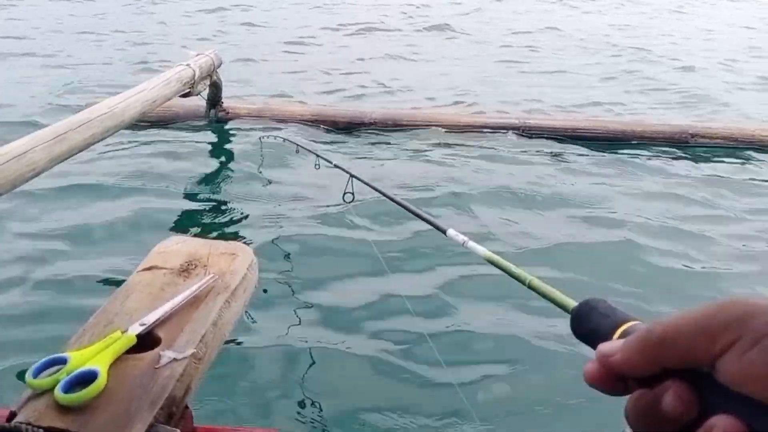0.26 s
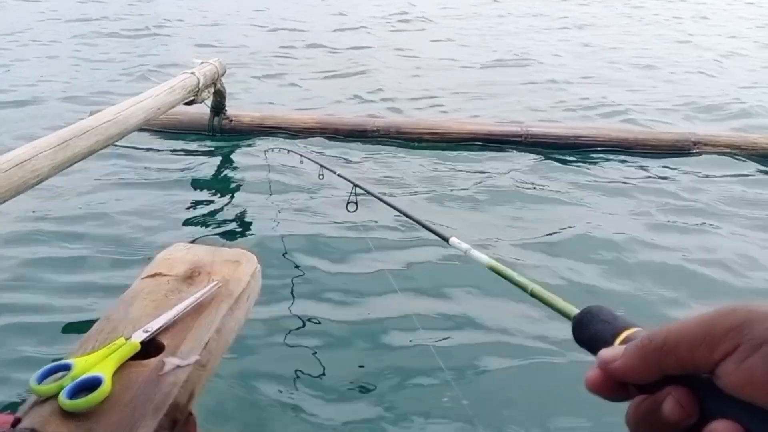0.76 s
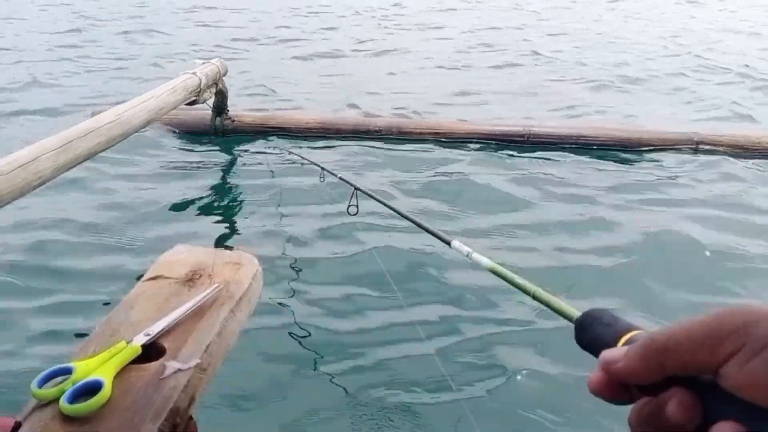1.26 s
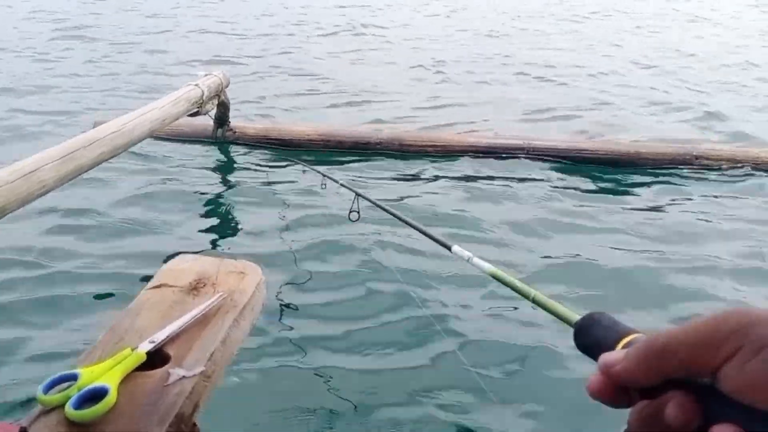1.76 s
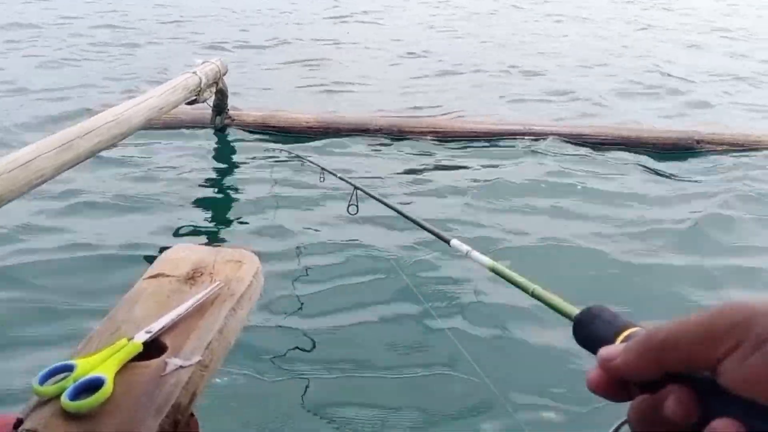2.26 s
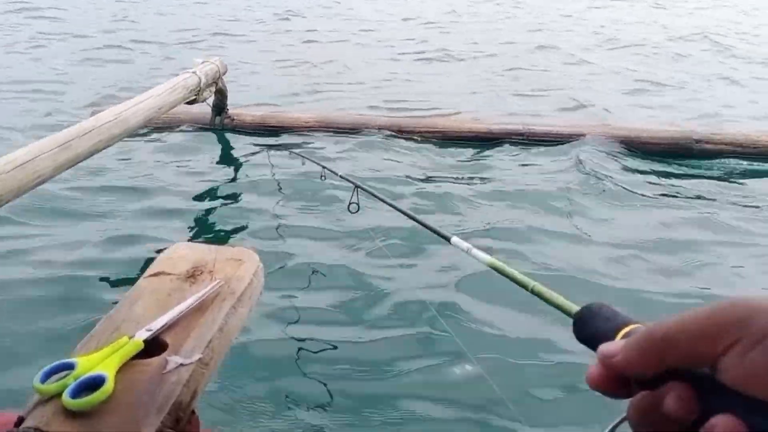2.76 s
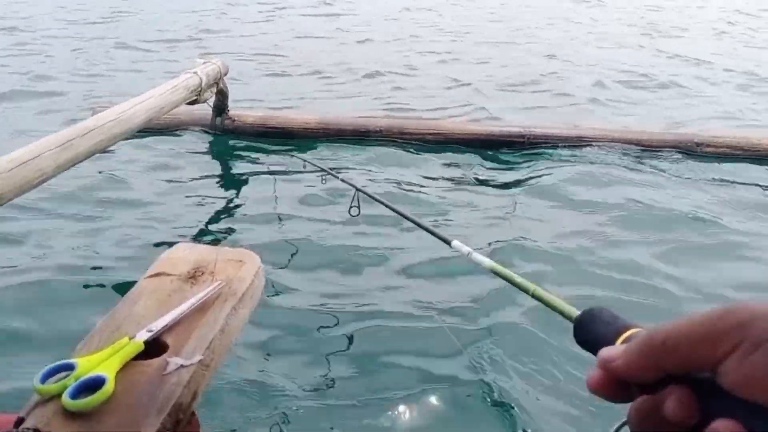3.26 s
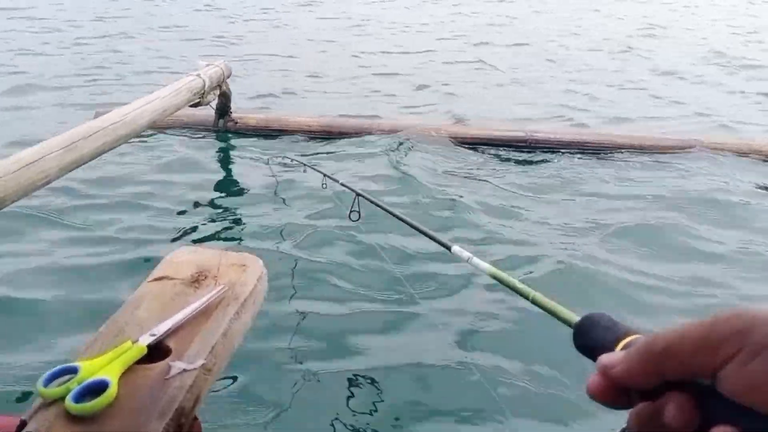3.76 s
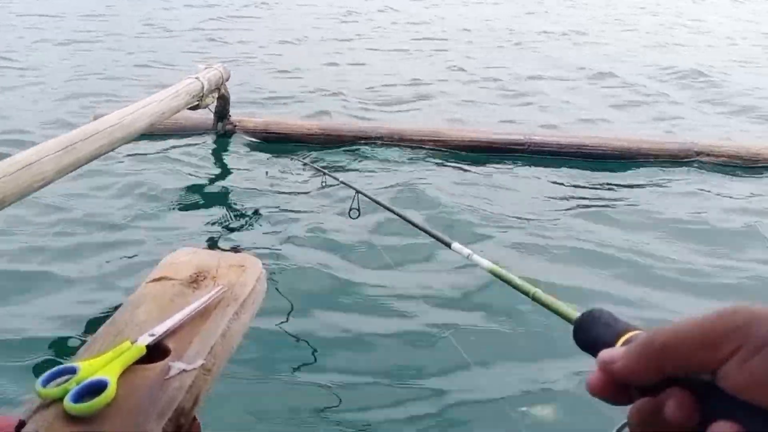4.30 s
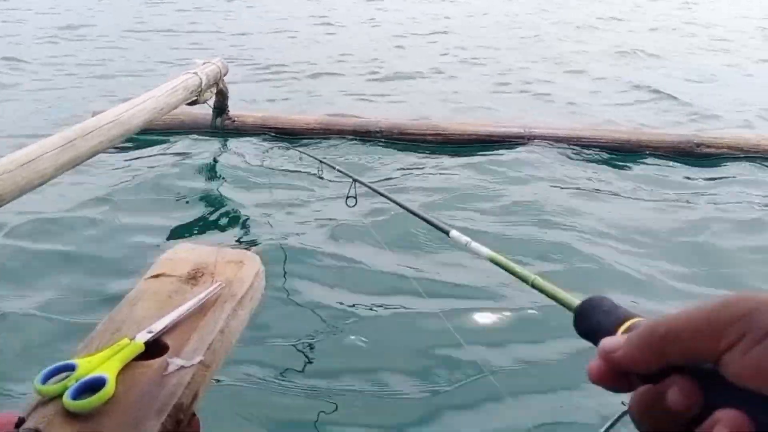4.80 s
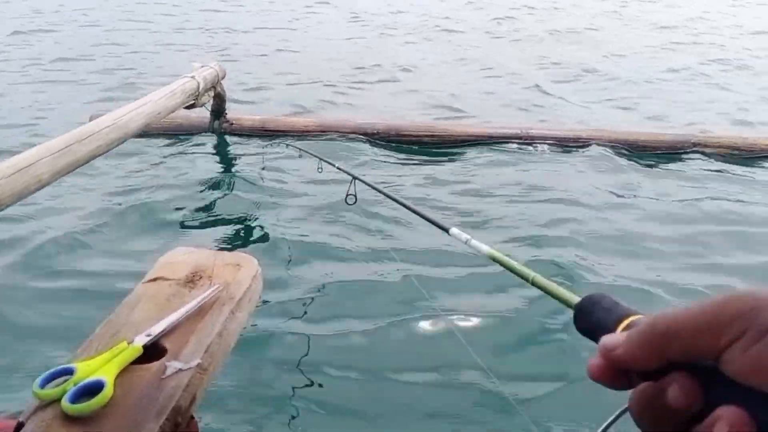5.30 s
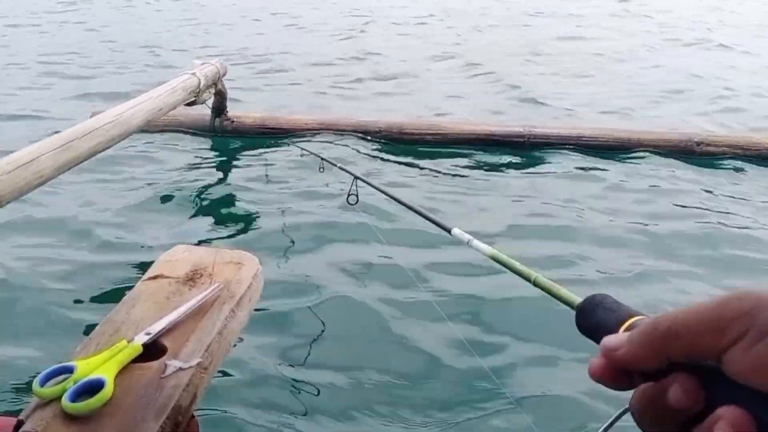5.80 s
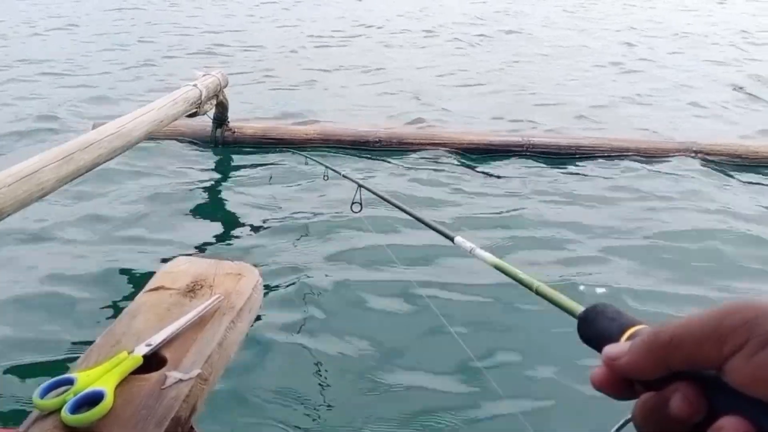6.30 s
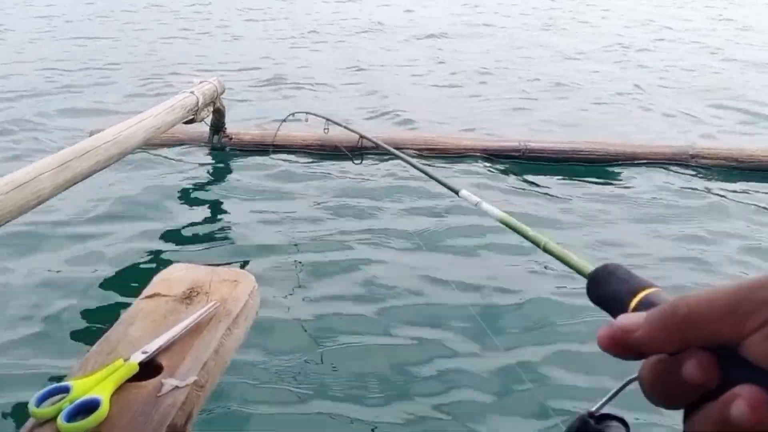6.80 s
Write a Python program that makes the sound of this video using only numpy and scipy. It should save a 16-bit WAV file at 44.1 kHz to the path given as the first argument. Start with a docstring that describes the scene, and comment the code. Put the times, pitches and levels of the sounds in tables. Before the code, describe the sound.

Wind buffets the microphone in low bursts as water laps and splashes close against a wooden boat, with faint insects far away.

```python
"""On a calm sea, a small microphone close to a wooden outrigger canoe. Wind buffets it at the start, as
small waves begin to slap the wood; each slap traps air that rings as a cluster of bubbles, and fine spray
flies. From about 2 s insects swell on the far shore, one thin singer among them. Near 5 s the gusts and
puffs come back hard, and the heaviest slap lands just before the end."""
import sys
import numpy as np
from scipy import signal
from scipy.fft import rfft, irfft, next_fast_len
from scipy.io import wavfile
from scipy.ndimage import uniform_filter1d

SR = 44100
rng = np.random.default_rng(int(sys.argv[2]) if len(sys.argv) > 2 else 0)


def dump(signal):
    """Clip the signal to [-1, 1] and save it as 16-bit WAV at the path in sys.argv[1]."""
    limited = np.clip(np.atleast_2d(signal).T, -1, 1)
    pcm = np.round(limited * 32767).astype(np.int16)
    wavfile.write(sys.argv[1], SR, pcm)


N = 310905

# close slaps on hull and float: start_s, level_db, pitch_hz (trapped air), froth_db (relative to level)
SLAPS = [(0.029, -41.5, 1178, -38), (0.371, -40, 1445, -38), (0.417, -33.5, 990, -31),
         (0.499, -28.5, 1216, -15), (0.58, -45, 1210, -18), (0.605, -41.5, 2200, -13),
         (0.635, -40, 912, -27), (0.715, -45.5, 1098, 0), (0.982, -38.5, 2230, -2), (0.999, -39, 530, -19),
         (1.013, -29.5, 2350, -17.5), (1.062, -37, 1450, -23.5), (1.082, -41, 614, -9),
         (1.131, -46.5, 2530, -20.5), (1.221, -37.5, 3265, -28), (1.248, -41, 1600, -25.5),
         (1.41, -33, 1273, -31), (1.554, -32.5, 1216, -3.5), (2.077, -26, 827, -14), (2.123, -39, 674, 3.5),
         (2.327, -30, 2320, -5.5), (2.513, -35, 757, -22.5), (2.549, -40.5, 4200, -26),
         (2.668, -28, 1273, -13.5), (2.725, -33, 1155, -20.5), (2.761, -32.5, 2060, -2),
         (2.874, -30, 1356, -21), (2.941, -27.5, 673, -13), (3.088, -27.5, 454, -7.5),
         (3.147, -35, 318, -21), (3.276, -43, 730, -18), (3.431, -45, 1750, -27), (3.477, -46, 2200, -31),
         (3.59, -34, 2865, -21.5), (3.749, -36, 833, -27), (3.898, -32, 1180, -21), (4.045, -35, 736, -15),
         (4.178, -42, 1440, -41), (4.297, -30, 1562, -6), (4.422, -40, 368, -17.5), (4.714, -42, 1344, -38),
         (4.787, -45.5, 1240, -24), (4.977, -28, 479, -15), (5.037, -32, 492, -18),
         (5.088, -56.5, 1310, -5.5), (5.149, -35, 990, -28), (5.148, -36.5, 2310, -16),
         (5.35, -42, 920, -31), (5.378, -25, 704, -13), (5.591, -47.5, 880, -32), (5.598, -37.5, 2860, 2.5),
         (5.643, -22.5, 731, -10), (5.676, -33.5, 3240, -5), (5.704, -38, 1640, -22),
         (5.775, -44.5, 3170, -18.5), (5.837, -33.5, 762, -16.5), (5.859, -35, 2510, -2),
         (6.108, -27, 635, -11.5), (6.338, -43, 2300, -4.5), (6.391, -31, 3930, -21),
         (6.492, -39.5, 1310, -33), (6.743, -25.5, 747, -5), (6.773, -31.5, 298, -5),
         (6.841, -18.5, 318, -9.5), (6.938, -32, 610, -5.5), (6.982, -38, 1150, -23.5)]
# sheets of water sliding off the wood: start_s, length_s, level_db, pitch_hz
SHEETS = [(1.027, 0.093, -43.5, 2540), (3.97, 0.13, -49, 6490), (4.025, 0.07, -39, 2190),
          (5.588, 0.086, -44, 2480), (6.824, 0.08, -29, 2227)]
# spray thrown by the waves: start_s, level_db, pitch_hz, fizz_db (relative to level)
SPRAY = [(0.608, -39.5, 5660, 0), (0.714, -46, 6380, -8), (0.988, -45.5, 7200, 6.5),
         (1.012, -37.5, 5870, 17.5), (1.067, -35.5, 7840, 2), (1.372, -47, 7430, 6),
         (1.699, -47.5, 4850, 3.5), (2.059, -37.5, 6280, 7.5), (2.1317, -38, 4510, -1),
         (2.211, -49, 6130, 5), (2.2827, -58.5, 5980, 19.5), (2.386, -51, 6000, 1),
         (2.459, -58, 7150, 25.5), (2.763, -40.5, 6700, -5.5), (3.076, -40, 6170, -47),
         (3.138, -55, 7470, 17.5), (3.277, -48.5, 5830, -17), (3.586, -45.5, 7480, 15),
         (3.682, -48.5, 6970, 4), (3.832, -32.5, 7070, 14), (4.033, -44, 6780, 3.5),
         (4.298, -34, 6180, 1.5), (4.63, -47, 6750, 14), (4.864, -47, 6230, -9), (5.029, -39.5, 6670, -6),
         (5.18, -36.5, 7960, -7), (5.6184, -27.5, 7370, -2.5), (5.858, -31.5, 5080, 1),
         (6.1, -48.5, 6120, -19), (6.3832, -32.5, 6050, 9.5), (6.719, -58, 6700, 19),
         (6.831, -38.5, 6430, -2), (6.861, -29, 6610, -14)]
# gusts on the microphone: full_strength_s, hold_s, level_db
GUSTS = [(0, 0.12, -27.5), (.2, 0.086, -26.5), (.31, 0.0063, -8), (.355, 0.045, -11), (.49, 0.042, -25.5),
         (.8, 0.03, -27.5), (1.83, 0.063, -41), (3.91, 0.045, -28), (4.85, 0.19, -25.5),
         (5.172, 0.0099, -15), (5.204, 0.023, -7.5), (5.28, 0.17, -19), (5.69, 0.36, -30),
         (6.07, 0.047, -25), (6.24, 0.11, -32), (6.36, 0.029, -23), (6.48, 0.18, -30.5), (6.87, 0.2, -32.5),
         (7.03, 0.076, -21.5)]
# sudden puffs on the membrane: start_s, level_db, pitch_hz, cycles
PUFFS = [(0.102, -10.5, 165, 9.4), (0.245, 1.5, 150, 3.32), (0.344, -0.5, 131, 2.9), (1.07, -21, 86, 6.4),
         (2.391, -4, 118, 5.7), (4.5, -14, 70.7, 3.6), (5.2, 3, 165.1, 5.5), (5.381, 0.5, 118.2, 5.7),
         (5.961, -11.5, 111, 8.8), (6.862, -5, 90.6, 4.9)]
# spectrum of the wind's buffeting: frequency_hz, gain_db
BUFFET_SPECTRUM = [(20, -24), (65, 7.5), (124, 3.5), (247, -17), (304, -43.5), (450, -29.5), (990, -120)]
# insect chorus on the far shore: time_s, level_db
CHORUS_LEVELS = [(0.0, -61), (1.96, -77), (2.2, -59), (2.71, -51.5), (4.06, -52), (4.55, -57.5),
                 (4.77, -53), (5.32, -67.5), (5.65, -58.5), (6.18, -70), (6.66, -61.5), (7.05, -52)]
# one steady singer: full_strength_s, hold_s, level_db
CRICKET = [(2.65, 0.34, -57)]
# spectrum of the open water all around: frequency_hz, gain_db
SEA_SPECTRUM = [(150, -21.5), (250, 1.5), (460, -12.5), (740, -17.5), (1420, -26), (3800, -28), (5200, -37),
                (6800, -31.5), (9250, -50), (14900, -32.5), (16500, -39)]
# the microphone's response to the close water: frequency_hz, gain_db
MICROPHONE_RESPONSE = [(6500, 12), (8000, 4), (9500, -23.5), (11500, -17.5), (14800, 2), (15600, 1.5),
                       (16000, -51.5)]

GUST_RISE_DB_PER_S, GUST_FALL_DB_PER_S = 1200, 806
CRICKET_RISE_DB_PER_S, CRICKET_FALL_DB_PER_S = 156, 21
BREEZE_DB, SEA_DB, BAND_EDGE_HZ = -46, -56, 16600


def slaps():
    """Close waves hit the wood: a trapped pocket of air rings under a froth of small bubbles."""
    out = np.zeros(N)
    for start_s, level_db, pitch_hz, froth_db in SLAPS:
        ring_s = 0.02 * (1000 / pitch_hz) ** 0.35  # big pockets ring longer
        spread_octaves = np.clip(0.454 + froth_db / 70, .05, .6)  # a frothy slap traps many sizes
        pocket = bubbles(pitch_hz, ring_s, spread_octaves, burst(.006, count=22), 850)
        froth = bubbles(np.sqrt(pitch_hz * 3200), 0.024, 0.5846, burst(0.0083, count=22), 650)
        add(out, start_s, gain_of(level_db) * pocket)
        add(out, start_s, gain_of(level_db + froth_db + 0.5) * froth)
    return out


def bubbles(pitch_hz, ring_s, spread_octaves, delays_s, fade_db_per_s):
    """A crowd of bubbles, peak 1, released at the given delays; each rings, bends in pitch and dies."""
    age = np.arange(round(ring_s * SR)) / SR
    detune, sign, bend, luck = rng.standard_normal((len(delays_s), 4)).T[:, :, None]
    delay_s = delays_s[:, None]
    hz = np.minimum(pitch_hz * 2 ** (spread_octaves * detune), SR / 3)
    swelling = 1 - 0.71 * np.exp(-delay_s / 0.0038)  # the first bubbles of a blow are weak
    strength = swelling * gain_of(5.86 * luck - 2.0 * abs(detune) - fade_db_per_s * delay_s)
    rise = np.minimum(age * hz / 4, 1) ** 1.5  # the neck closes over a few cycles
    envelope = strength * rise * gain_of(-60 * age / ring_s)
    rings = np.sign(sign) * envelope * np.sin(2 * np.pi * hz * age * (1 + 2.0 * bend * age))
    positions = (delay_s * SR).astype(int) + np.arange(len(age))
    crowd = np.bincount(positions.ravel(), rings.ravel())
    return crowd / abs(crowd).max()


def burst(scale_s, count):
    """Release delays of a blow's bubbles: crowded soon after the start, then thinning out."""
    delays_s = rng.gamma(1.3, scale_s, count)
    return delays_s - delays_s.min()


def sheets():
    """Water slides off the wood in a longer run of bubbles."""
    out = np.zeros(N)
    for start_s, length_s, level_db, pitch_hz in SHEETS:
        delays_s = length_s * rng.beta(2, 2.5, size=70)
        sheet = bubbles(pitch_hz, 0.022, 1900 / (pitch_hz + 1200), delays_s, 0)
        add(out, start_s, gain_of(level_db) * sheet)
    return out


def laps():
    """Small laps at random moments, three faint bubbles each."""
    out = np.zeros(N)
    for when, pitch, size in rng.random((130, 3)):
        lap = bubbles(900 * 3.0 ** pitch, 0.14, 0.1, burst(0.0087, count=3), 260)
        add(out, when * N / SR, gain_of(-70 + 12 * size ** 2) * lap)
    return out


def spray():
    """Droplets land close by as tiny bubbles and a puff of fizz; faint bursts fall at random."""
    out, t = np.zeros(N), np.arange(SR // 8) / SR
    faint = [(when * N / SR, -68 + 11 * size ** 2, 5400 * 1.4 ** pitch, -6.0)
             for when, size, pitch in rng.random((60, 3))]
    hiss = unit_rms(filtered(rng.standard_normal(N + len(t)), 4, 9500, "high"))
    crackle = gain_of(5.64 * unit_rms(uniform_filter1d(rng.standard_normal(len(hiss)), 60)))
    fizz = hiss * crackle
    rise = 1 - np.exp(-(t / 0.006) ** 2)
    for start_s, level_db, pitch_hz, fizz_db in SPRAY + faint:
        droplets = bubbles(pitch_hz, 0.017, 0.2, burst(0.0077, count=16), 790)
        add(out, start_s, gain_of(level_db) * droplets)
        envelope = rise * gain_of(level_db + fizz_db - 60 * (t / 0.051) ** 1.31)
        add(out, start_s, envelope * fizz[round(start_s * SR):][:len(t)])
    return out


def hull_tail(water, ring_s=0.085):
    """The open hull and the sea surface give a short diffuse tail."""
    t = np.arange(round(.25 * SR)) / SR
    tail = rng.standard_normal(len(t)) * gain_of(-60 * t / ring_s) * (t > .004)
    tail = filtered(tail, 1, 3500, "low")  # wood and water swallow the treble
    return signal.fftconvolve(water, tail / np.linalg.norm(tail))[:N]


def wind():
    """Air right on the microphone: lumpy low noise from a light breeze and its gusts."""
    pressure = swells(GUSTS, GUST_RISE_DB_PER_S, GUST_FALL_DB_PER_S)
    lumps = unit_rms(coloured(rng.standard_normal(N), BUFFET_SPECTRUM) * gain_of(1.6 * wander(12.0)))
    breeze = unit_rms(filtered(lumps, 1, 150, "high"))  # light air lacks the deep bass
    flutter = unit_rms(filtered(rng.standard_normal(N), 4, [170, 300], "band"))
    eddies = gain_of(2.5) * pressure ** 2 * flutter  # strong gusts shed smaller eddies
    return pressure * lumps + gain_of(BREEZE_DB) * breeze + eddies


def puffs():
    """Each sudden puff swings the membrane for a few cycles; eddies shake the period."""
    out = np.zeros(N)
    for start_s, level_db, pitch_hz, cycles in PUFFS:
        t = np.arange(round(cycles / pitch_hz * SR)) / SR
        shake = unit_rms(uniform_filter1d(uniform_filter1d(rng.standard_normal(len(t)), 150), 150))
        swing = np.sin(2 * np.pi * np.cumsum(pitch_hz * (1 + 0.29 * shake)) / SR)
        envelope = np.sin(np.pi * (t / t[-1]) ** 0.42) ** 3.1
        add(out, start_s - .002, gain_of(level_db) * envelope * swing)
    return out


def insect_chorus():
    """Far off on the shore, groups of singers swell at random in one narrow, fuzzy band."""
    noise = rng.standard_normal(N)
    groups = [filtered(noise, 2, [hz - 28, hz + 28], "band") for hz in np.linspace(4240, 4560, num=5)]
    chorus = unit_rms(sum(group * gain_of(3.6 * wander(2.4)) for group in groups))
    flicker = gain_of(2.0 * wander(13.0))
    time_s, level_db = np.transpose(CHORUS_LEVELS)
    level = gain_of(np.interp(np.arange(N) / SR, time_s, level_db, left=-200, right=-200))
    return level * flicker * chorus


def cricket(pitch_hz=4756, pulse_hz=93):
    """One distant singer holds a thin, lightly pulsed line, then fades."""
    t = np.arange(N) / SR
    song = np.sin(2 * np.pi * pitch_hz * t) * (1 + 0.14 * np.sin(2 * np.pi * pulse_hz * t))
    flicker = gain_of(1.2 * wander(21))
    return swells(CRICKET, CRICKET_RISE_DB_PER_S, CRICKET_FALL_DB_PER_S) * flicker * song


def sea():
    """The quiet wash of open water all around, drifting slowly in level; its treble flickers."""
    wash = unit_rms(coloured(rng.standard_normal(N), SEA_SPECTRUM))
    treble = filtered(wash, 2, 5000, "high")
    level = gain_of(SEA_DB + 2.0 * wander(1.9))
    flicker = gain_of(0.87 * wander(9)) - 1
    return level * (wash + flicker * treble)


def swells(rows, rise_db_per_s, fall_db_per_s):
    """Amplitude of swells that rise, hold and fall at set rates."""
    t = np.arange(N) / SR
    return sum(gain_of(level_db - rise_db_per_s * np.maximum(full_s - t, 0)
                       - fall_db_per_s * np.maximum(t - full_s - hold_s, 0))
               for full_s, hold_s, level_db in rows)


def wander(rate_hz):
    """Slow random curve of rms 1."""
    return unit_rms(filtered(rng.standard_normal(N), 2, rate_hz, "low"))


def coloured(x, spectrum):
    """Shapes x by a spectrum drawn on a log-frequency axis."""
    points_hz, gain_db = np.transpose(spectrum)
    size = next_fast_len(len(x))
    hz = np.fft.rfftfreq(size, 1 / SR)
    response = gain_of(np.interp(np.log(hz + 1), np.log(points_hz + 1), gain_db))
    return irfft(rfft(x, size) * response, size)[:len(x)]


def filtered(x, order, edge_hz, kind):
    """Low-, high- or band-passes x."""
    return signal.sosfilt(signal.butter(order, edge_hz, kind, fs=SR, output="sos"), x)


def gain_of(db):
    """Decibels to amplitude."""
    return 10 ** (np.asarray(db) / 20)


def unit_rms(x):
    """Scales to rms 1."""
    return x / np.sqrt(np.mean(x ** 2) + 1e-20)


def add(mix, start_s, sound):
    """Mixes a sound in at start_s."""
    part = mix[round(start_s * SR):][:len(sound)]
    part += sound[:len(part)]


def scene():
    """In mono: close water and its tail, the far shore and open sea, and wind on the microphone."""
    water = coloured(slaps() + sheets() + laps() + spray(), MICROPHONE_RESPONSE)
    canoe = water + gain_of(-9.5) * hull_tail(water)
    background = insect_chorus() + cricket() + sea()
    return (canoe + background + wind() + puffs())[None]


def record(dry):
    """Bass cut, gain control that ducks after loud wind, clipping of the strongest puffs, band limit."""
    cut = filtered(dry, 2, 72, "high")
    memory = np.exp(-1 / (.25 * SR))  # the gain control averages over a quarter second
    power_db = 10 * np.log10(signal.lfilter([1 - memory], [1, -memory], cut ** 2) + 1e-12)
    duck_db = 0.091 * np.maximum(power_db + 21.5, 0)
    clipped = np.clip(cut / gain_of(duck_db), -1, 1)
    band_limit = signal.firwin(511, BAND_EDGE_HZ, window=("kaiser", 9), fs=SR)
    return signal.oaconvolve(clipped, band_limit[None], "same")


dry = scene()
out = record(dry)
dump(out)
```